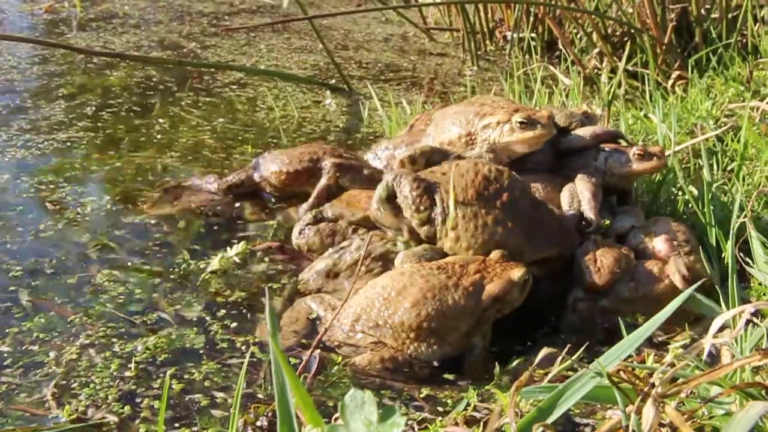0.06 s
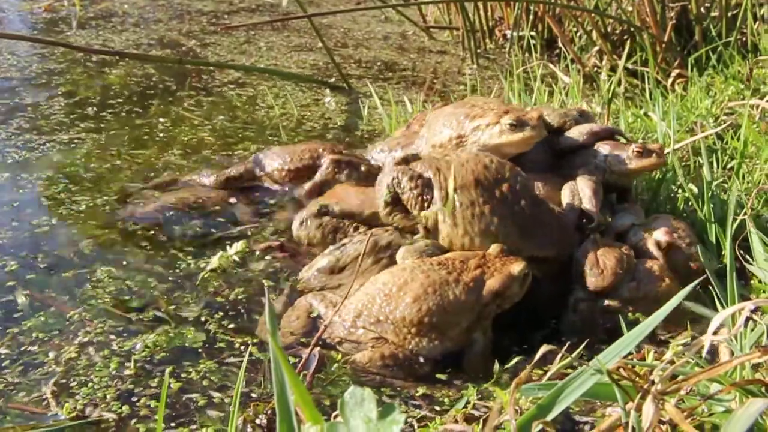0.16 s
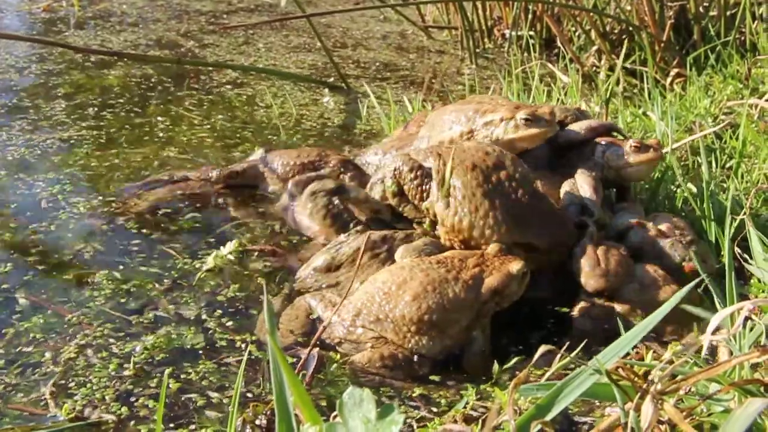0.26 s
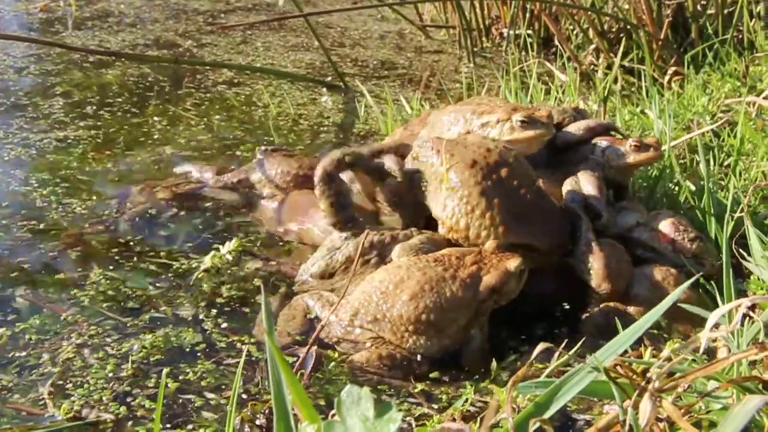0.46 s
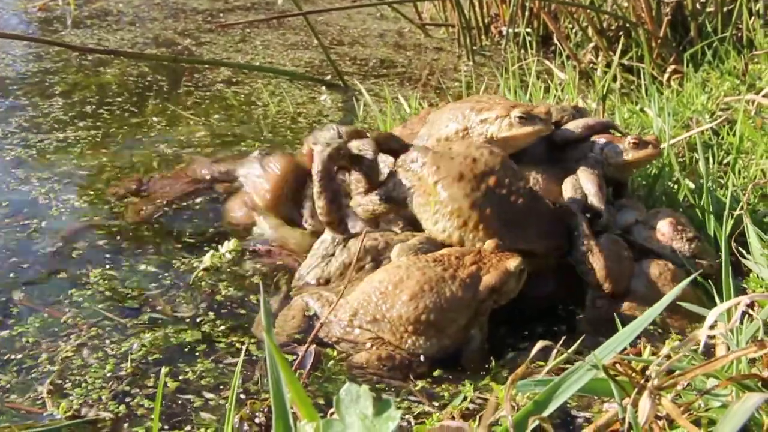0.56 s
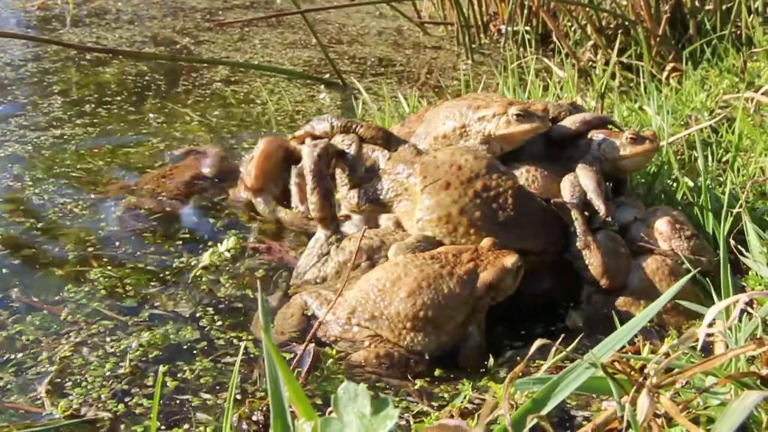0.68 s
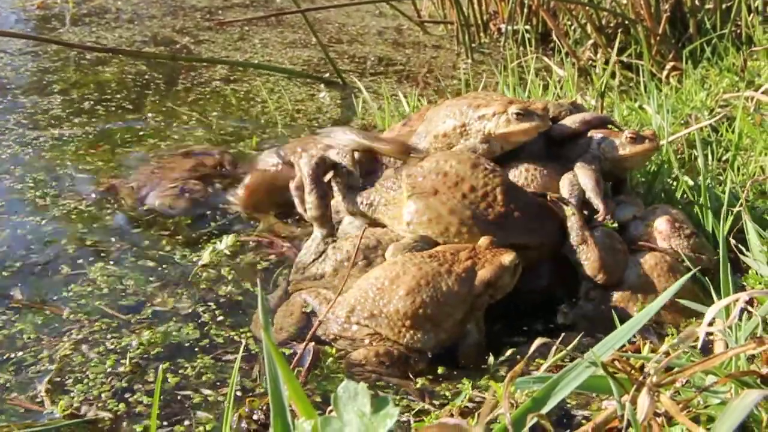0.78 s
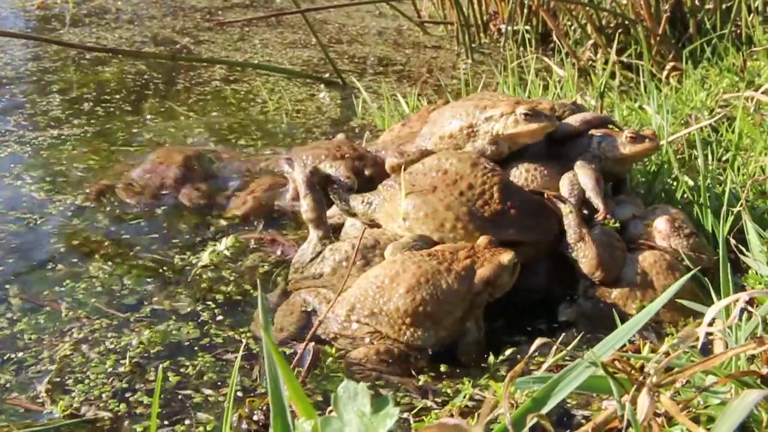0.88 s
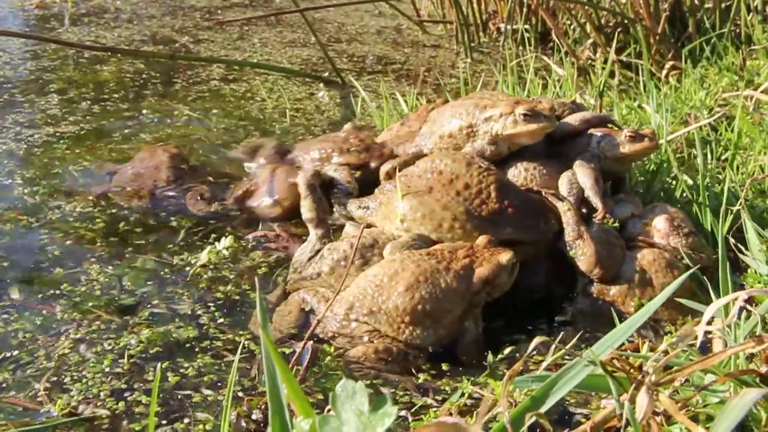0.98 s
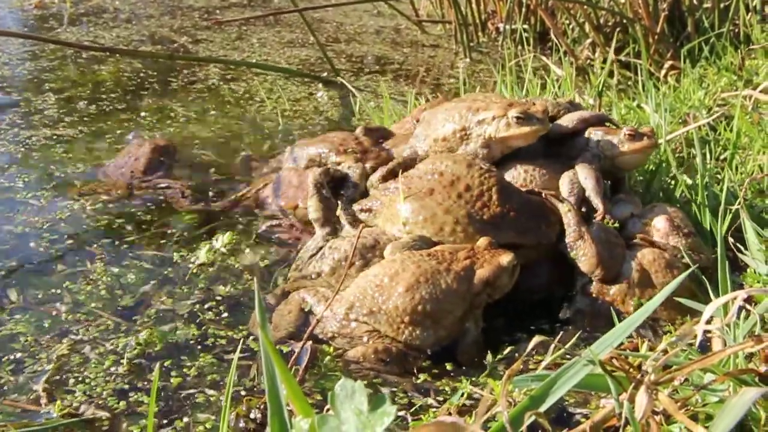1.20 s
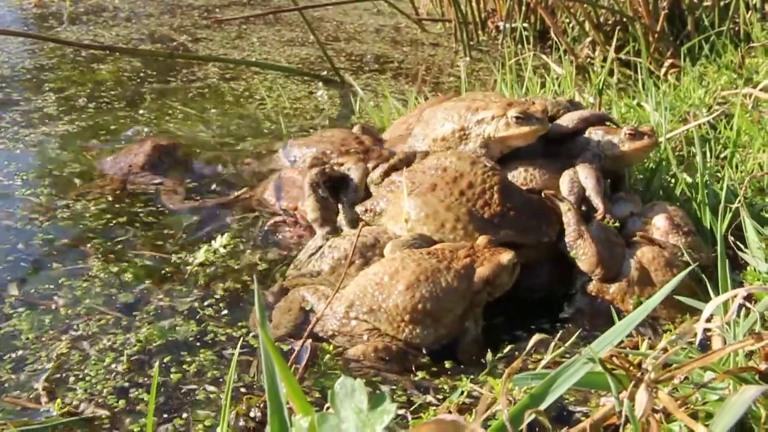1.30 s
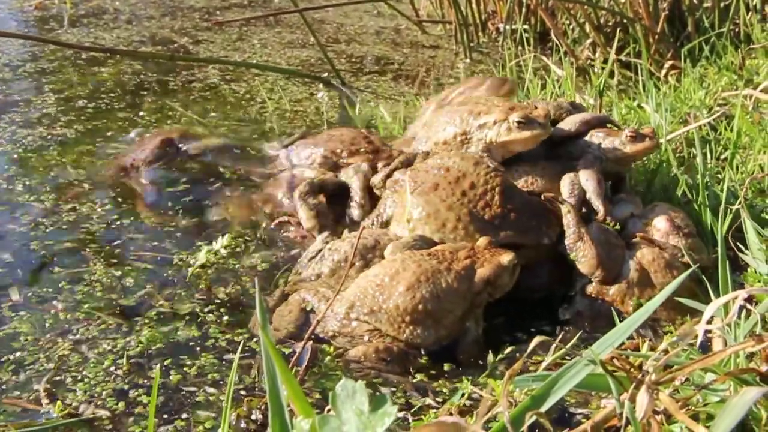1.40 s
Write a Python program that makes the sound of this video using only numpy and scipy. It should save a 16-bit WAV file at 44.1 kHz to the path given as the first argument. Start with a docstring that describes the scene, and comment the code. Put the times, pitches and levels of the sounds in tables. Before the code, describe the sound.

Toads chirp close by at a pond edge, with short loud calls at about 0.2, 0.6 and 1.1 seconds. Softer chirps and peeps fall between them and near 1.4 seconds, and a thin squeak joins the second call. Small wet clicks and faint sloshes are scattered throughout, sharpest around 1.1 to 1.2 seconds. Distant birds twitter and coo faintly over quiet outdoor air.

```python
"""A grassy pond edge, where a heap of toads jostles. Each chirp starts as quick throat pulses that
speed up and fuse into a tone near 1.1 kHz: three loud ones close by, softer ones from inside the
heap, with round peeps and thin squeaks among them. Wet skin and small bubbles tick, and limbs stir
up sloshes and spray. Far off, birds twitter and coo over quiet outdoor air and a faint low hum."""
import sys
import numpy as np
from scipy import signal
from scipy.fft import rfft, irfft, next_fast_len
from scipy.io import wavfile
from scipy.ndimage import map_coordinates

SR = 44100
rng = np.random.default_rng(int(sys.argv[2]) if len(sys.argv) > 2 else 0)


def dump_mix(stems):
    """Bounce the given channels to the path in sys.argv[1] as a 16-bit WAV at rate SR."""
    frames = np.atleast_2d(stems).T  # one column per channel
    limited = np.clip(frames, -1, 1)  # hard clip at full scale
    pcm = np.round(limited * 32767).astype(np.int16)
    wavfile.write(sys.argv[1], SR, pcm)


N = 63945

# The loud chirps' contours. Each row: time in seconds, pitch in Hz, level in dB, overtone trim in dB.
CHIRP_A = [(.2037, 1326, -9.5, -12), (.209, 1344, -30.5, 17), (.213, 1203, -10.5, 3), (.229, 1158, -11, 4),
           (.248, 1149, -12.5, 0), (.266, 1136, -17, -11), (.275, 1170, -30, -21), (.282, 1140, -55, -28)]
CHIRP_B = [(.6145, 1037, -25.5, 11), (.623, 1017, -24.5, -0.5), (.634, 1119, -16, 2),
           (.651, 1168, -14.5, -1.5), (.655, 1232, -20, -3), (.659, 1275, -38, -8), (.669, 1110, -46.5, 3),
           (.68, 1030, -53, -10)]
CHIRP_C = [(1.118, 940, -30.5, 14), (1.125, 1022, -26.5, -2.5), (1.134, 1104, -18.5, -1),
           (1.146, 1128, -16.5, 3), (1.182, 1066, -15, -10), (1.2, 1068, -19, -9.5),
           (1.211, 1106, -28.5, -31), (1.217, 1130, -46.5, -21)]
# Their voicing. Each row: contour, pulsed opening in seconds, treble trim in dB.
LOUD_CHIRPS = [(CHIRP_A, 0.03, -16), (CHIRP_B, 0.0088, 0), (CHIRP_C, 0.00088, 1.8)]
# Chirps inside the heap. Each row: start and length in seconds, first and last pitch in Hz,
# level in dB, pulsed opening in seconds, starting pulse rate in Hz, overtone trim in dB.
SOFT_CHIRPS = [(0.225, 0.047, 921, 900, -32, 0.0013, 135, -3.5),
               (0.3057, 0.074, 896, 939, -34, 0.058, 114, -10.5),
               (0.554, 0.068, 1089, 1018, -34, 0.05, 135.3, -5),
               (0.903, 0.07, 1072, 949, -37, 0.0594, 131.7, -5),
               (1.3571, 0.047, 1040, 1054, -34, 0.021, 144, -21.5)]
# Round peeps. Each row: start and length in seconds, first and last pitch in Hz,
# level and overtone trim in dB.
PEEPS = [(0.183, 0.0039, 1390, 1093, -17, 1), (0.682, 0.038, 1080, 1144, -25, -31)]
# Tone colour of both throats and of the hiss opening a pulse. Each row: frequency in Hz, gain in dB.
LOUD_THROAT = [(500, -27), (2200, -22), (3400, -25), (4450, -34), (4850, -66.5), (5700, -35), (6800, -39.5),
               (8000, -58), (9200, -43), (10200, -27), (11300, -20), (12500, -37.5), (13800, -25),
               (15000, -42), (17000, -68)]
SOFT_THROAT = [(400, -35), (2000, -8.5), (3000, -22), (4500, -40), (6000, -30), (8000, -45.5),
               (12000, -24.5), (17000, -28)]
SNAP_EQ = [(1500, -30), (3000, -13), (6000, -12), (8500, -9), (11000, -6), (14500, 3), (17000, -8)]
# Thin squeaks. Each row: start and length in seconds, first and last pitch in Hz, level in dB.
SQUEAKS = [(.6545, .032, 3180, 2830, -32.5), (.762, .036, 3120, 2900, -55)]
# Wet ticks. Each row: start in seconds, level in dB, pitch in Hz, seconds to fall 60 dB,
# crack width in octaves.
TICKS = [(0.037, -33.5, 3600, 0.0022, 3), (0.2746, -20.5, 2340, 0.0041, 1.1),
         (0.3065, -36.5, 9200, 0.005, 2), (0.3597, -36.5, 10000, 0.004, 2),
         (0.4068, -33.5, 2200, 0.003, 2.5), (.4175, -36.5, 8000, 0.005, 1.2),
         (0.4515, -30.5, 2870, 0.0045, 2.1), (.464, -39, 2900, 0.007, 1.3), (0.454, -45, 8500, 0.0073, 1),
         (0.4575, -29.5, 990, 0.004, 2.8), (0.46, -28.5, 13200, 0.0046, 1.5),
         (.4935, -44.5, 13500, .006, 1), (0.4946, -40.5, 3130, 0.015, 1), (0.775, -42, 9400, .004, 2),
         (0.9681, -29, 2224, 0.0039, 1.25), (1.091, -19, 12700, 0.003, 1), (1.094, -37.5, 2500, .005, 1.7),
         (1.1113, -35, 13700, 0.0035, .6), (1.116, -15.5, 7400, 0.0039, 0.98),
         (1.1327, -11, 11300, .0025, .9), (1.146, -19, 11000, 0.002, 1.1), (1.1616, -12, 12100, 0.002, .9),
         (1.18, -18.5, 1330, 0.007, 1.5), (1.1801, -19.5, 6700, .0014, 3),
         (1.2717, -29.5, 2640, 0.002, 2.5)]
# Stirred water, sloshing and fizzing. Each row: start and length in seconds, level in dB.
SLOSHES = [(0.124, 0.04, -52), (0.297, 0.038, -46), (0.433, 0.046, -47.5), (0.86, 0.016, -50.5)]
SPRAYS = [(0.302, 0.029, -52), (0.391, .045, -50.5), (0.447, 0.045, -50), (1.067, .05, -52),
          (1.32, 0.064, -50)]
# Far bird notes. Each row: start and length in seconds, first and last pitch in Hz, level in dB.
WHISTLES = [(.01, 0.12, 4140, 4073, -54), (0.122, 0.3, 4260, 4220, -57.5), (0.246, 0.24, 4066, 3990, -60.5),
            (0.482, 0.13, 4330, 4300, -64), (.6, .08, 4080, 4260, -57), (0.761, 0.11, 4154, 4080, -51),
            (0.776, 0.17, 4340, 4370, -57.5), (.88, 0.14, 4143, 4145, -56), (0.93, 0.171, 4410, 4210, -60),
            (0.989, .12, 4130, 4000, -53), (1.125, 0.22, 4060, 4130, -63.5), (0.51, 0.31, 5700, 5600, -65),
            (1.174, 0.38, 5640, 5620, -65.5)]
# Far coos. Each row: start and length in seconds, top pitch in Hz, level in dB.
COOS = [(-.1, 0.24, 513, -56.5), (.39, 0.16, 522, -52), (.98, .16, 532.8, -46.5), (1.26, 0.24, 514.3, -49)]
# Noise colour of the sloshes, the birds' echo and the air. Each row: frequency in Hz, gain in dB.
SLOSH_EQ = [(100, -47), (350, 2.5), (650, 7), (1200, -22), (4000, -15.5), (16000, -48)]
BIRD_ECHO_EQ = [(3300, -53), (3850, -8), (4120, -4.5), (4350, -8.5), (4700, -39), (5200, -72)]
AIR_EQ = [(15, -45), (25, -5.5), (180, -7), (301, -10.5), (326, -13), (463, -9.5), (503, -5), (575, -11),
          (2110, -19.5), (2760, -20.5), (3720, -19), (4030, -23.5), (4740, -21.5), (5570, -24),
          (16000, -28.5)]


def amp(db):
    """Decibels to gain."""
    return 10 ** (np.asarray(db) / 20)


def unit(x):
    """Scale to an rms of 1."""
    return x / np.sqrt(np.mean(x ** 2) + 1e-20)


def eq_db(eq, hz):
    """Read an EQ curve on a log frequency axis."""
    points_hz, db = np.transpose(eq)
    return np.interp(np.log(hz + 1), np.log(points_hz + 1), db)


def clock(length):
    """Sample times in seconds."""
    return np.arange(max(int(length * SR), 8)) / SR


def cycles(hz):
    """Running cycle count of a moving pitch."""
    return np.cumsum(hz) / SR


def wobble(t, rate):
    """A smooth random curve, rate knots a second."""
    return map_coordinates(rng.standard_normal(2048), [t * rate], mode="wrap")


def filtered(x, response):
    """Apply a gain that depends on frequency."""
    size = next_fast_len(N + SR // 2)
    return irfft(rfft(x, size) * response(np.fft.rfftfreq(size, 1 / SR)), size)[:N]


def noise(eq):
    """Coloured noise of rms 1."""
    return unit(filtered(rng.standard_normal(N), lambda hz: amp(eq_db(eq, hz))))


def add(out, start, x):
    """Mix x in at start seconds."""
    i = int(round(start * SR))
    x = x[max(-i, 0):max(N - i, 0)]
    out[max(i, 0):max(i, 0) + len(x)] += x


def toad_voice(t, hz, gain, pulsed_s, throat, overtones_db, treble_db=0, rough=0, pulse_hz=134.8):
    """Throat pulses quicken and fuse into a tone; rough makes them uneven, narrow and breathy."""
    quicken_hz_per_s, treble_hz, snap_t60_pulses = 850, 8500, .99
    rate_hz = (pulse_hz + quicken_hz_per_s * t) * (1 + rough * .06 * wobble(t, 140))
    pulse, position = np.divmod(cycles(rate_hz), 1)
    detune, size = rng.standard_normal(size=(64, 2))[pulse.astype(int)].T
    depth = np.clip(2 * (1 - t / max(pulsed_s, 1 / SR)), 0, 1)  # 1 is pulsing, 0 is fused
    gate = 1 - depth * (1 - np.abs(np.sin(np.pi * position)) ** (1.5 + 1.3 * rough))
    bend = .059 * (1 - 2 * position) + rough * .06 * detune  # pitch droops through each pulse
    hz = hz * (1 + depth * bend + .00093 * wobble(t, 460))
    phase = 2 * np.pi * cycles(hz)
    tone = np.sin(phase)
    for k in range(2, 17):
        trim_db = overtones_db * (.5 if k == 2 else 1) + treble_db * (k * hz.mean() > treble_hz)
        shimmer_db = 3 * wobble(t, 147)
        level = amp(eq_db(throat, k * hz) + trim_db + shimmer_db)
        tone += level * np.sin(k * phase + rng.uniform(0, 2 * np.pi))
    rasp = amp(-40.5 + overtones_db + 16.5 * depth * (1 - position + rough)) * noise(throat)[:len(t)]
    snap = depth * amp(-24.5 - 60 * position / snap_t60_pulses) * noise(SNAP_EQ)[:len(t)]
    return gain * amp(rough * depth * 1.2 * size) * (gate * (tone + rasp) + snap)


def toads():
    """Loud chirps up front, rougher soft ones in the heap, and smooth swelling peeps."""
    out = np.zeros(N)
    for contour, pulsed_s, treble_db in LOUD_CHIRPS:
        times, *columns = np.transpose(contour)
        t = clock(times[-1] - times[0])
        hz, db, overtones_db = [np.interp(times[0] + t, times, column) for column in columns]
        chirp = toad_voice(t, hz, amp(db), pulsed_s, LOUD_THROAT, overtones_db, treble_db, rough=.13)
        add(out, times[0], chirp)
    attack_s, release_s, sag_db_per_s = .005, .018, 60
    for start, length, first_hz, last_hz, db, pulsed_s, pulse_hz, overtones_db in SOFT_CHIRPS:
        t = clock(length)
        hz = np.linspace(first_hz, last_hz, len(t))
        fades = np.clip(np.minimum(t / attack_s, (length - t) / release_s), 0, 1)
        gain = amp(db - sag_db_per_s * t) * fades
        chirp = toad_voice(t, hz, gain, pulsed_s, SOFT_THROAT, overtones_db, rough=1, pulse_hz=pulse_hz)
        add(out, start, chirp)
    for start, length, first_hz, last_hz, db, overtones_db in PEEPS:
        t = clock(length)
        hz = np.linspace(first_hz, last_hz, len(t))
        add(out, start, toad_voice(t, hz, amp(db) * np.hanning(len(t)), 0, SOFT_THROAT, overtones_db))
    return out


def squeaks():
    """Thin falling squeaks that flutter at the pitch of the throat."""
    flutter_hz, fade_db_per_s = 1130, 850
    out = np.zeros(N)
    for start, length, first_hz, last_hz, db in SQUEAKS:
        t = clock(length)
        phase = 2 * np.pi * cycles(np.linspace(first_hz, last_hz, len(t)))
        flutter = 1 + .35 * np.sin(2 * np.pi * flutter_hz * t)
        gain = amp(db - fade_db_per_s * t) * signal.windows.tukey(len(t), .2)
        add(out, start, gain * flutter * (np.sin(phase) + amp(-22) * np.sin(2 * phase)))
    return out


def wet_tick(db, hz, t60, octaves):
    """A tiny bubble or wet film bursts: a short rising ring and a crack around the same pitch."""
    rise, attack_s = .16, .00017
    t = clock(.02)
    ring = np.sin(2 * np.pi * cycles(hz * (1 + rise * np.minimum(t / t60, 1))))
    octaves_off = np.log2((np.fft.rfftfreq(len(t), 1 / SR) + 1) / hz)
    band = 1 / (1 + (2 * octaves_off / octaves) ** 2)
    crack = unit(irfft(rfft(rng.standard_normal(len(t))) * band, len(t)))
    envelope = amp(db - 60 * t / t60) * (1 - np.exp(-(t / attack_s) ** 2))
    return envelope * (amp(-2) * ring + amp(-4.5) * crack)


def water():
    """Clambering toads stir the water: single ticks, soft sloshes and a fizz of tiny bursts."""
    out, swell = np.zeros(N), np.zeros(N)
    for start, db, hz, t60, octaves in TICKS:
        add(out, start, wet_tick(db, hz, t60, octaves))
    for start, length, db in SLOSHES:
        add(swell, start, amp(db) * np.hanning(len(clock(length))))
    out += swell * noise(SLOSH_EQ)
    ticks_per_s, spray_hz, spread_octaves, spread_db = 1000, 8350, 1.6, 9
    for start, length, db in SPRAYS:
        for when, size, pitch in rng.random((int(ticks_per_s * length), 3)):
            hz = spray_hz * 2 ** (spread_octaves * (pitch - .5))
            tick = wet_tick(db + spread_db * (size - .5), hz, t60=.003, octaves=.85)
            add(out, start + when * length, tick)
    return out


def birds():
    """Far birds: thin wavering whistles and low arched coos, with a noise wash for blurred echo."""
    out = amp(-63) * noise(BIRD_ECHO_EQ)
    for start, length, first_hz, last_hz, db in WHISTLES:
        t = clock(length)
        hz = np.linspace(first_hz, last_hz, len(t)) * (1 + .006 * wobble(t, 108.3))
        gain = amp(db + 4 * wobble(t, 48.4)) * signal.windows.tukey(len(t))
        add(out, start, gain * np.sin(2 * np.pi * cycles(hz)))
    for start, length, top_hz, db in COOS:
        t = clock(length)
        arch = 1 - .0763 * (2 * t / length - 1) ** 2
        hz = top_hz * (arch + .0074 * wobble(t, 73))
        gain = amp(db + wobble(t, 41)) * np.sin(np.pi * t / length)
        add(out, start, gain * np.sin(2 * np.pi * cycles(hz)))
    return out


def air():
    """A quiet bed of outdoor noise with a faint wavering low hum."""
    t = np.arange(N) / SR
    hum_gain = amp(-62 + 1.4 * wobble(t, 9.5))
    hum_hz = 90.2 * (1 + .046 * wobble(t, 13))
    return amp(-55.5) * noise(AIR_EQ) + hum_gain * np.sin(2 * np.pi * cycles(hum_hz))


def scene():
    """A mono mix: air and birds behind, toads and water in front."""
    return (air() + birds() + toads() + squeaks() + water())[None]


def record(dry):
    """A brick-wall high cut at 16.1 kHz."""
    return filtered(dry[0], lambda hz: hz < 16100)[None]


dry = scene()
out = record(dry)
dump_mix(out)
```